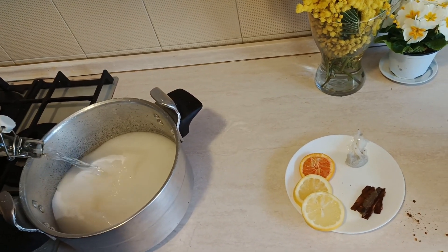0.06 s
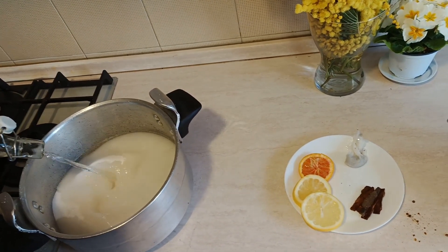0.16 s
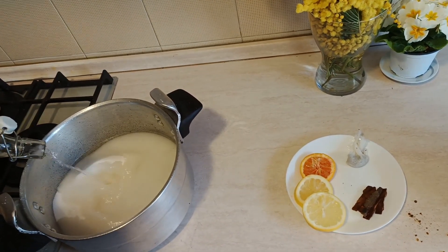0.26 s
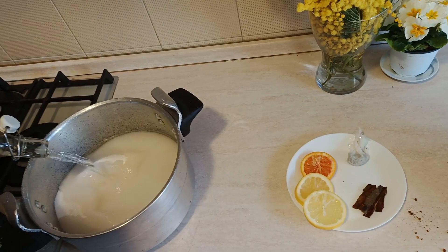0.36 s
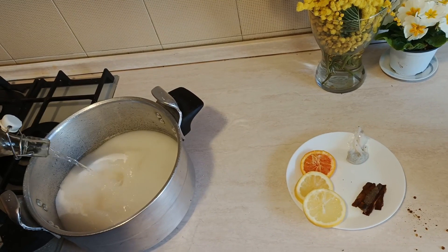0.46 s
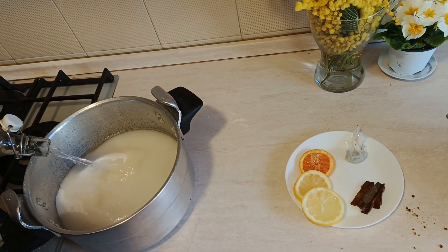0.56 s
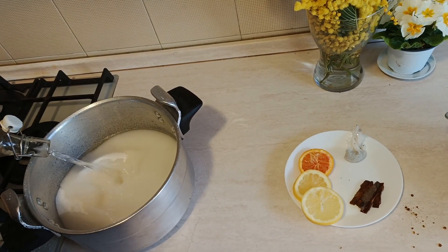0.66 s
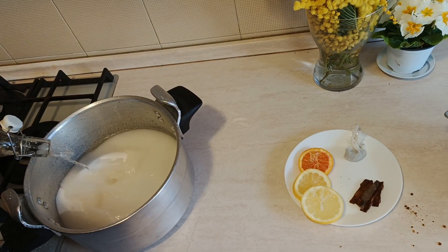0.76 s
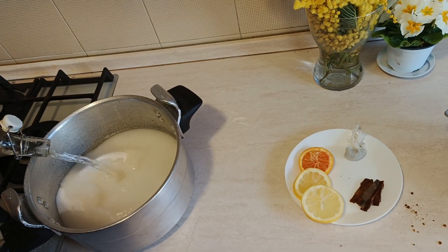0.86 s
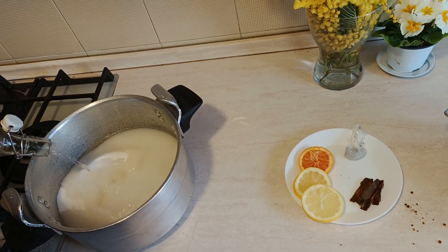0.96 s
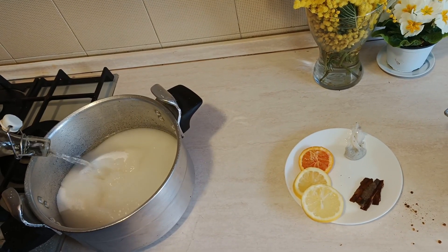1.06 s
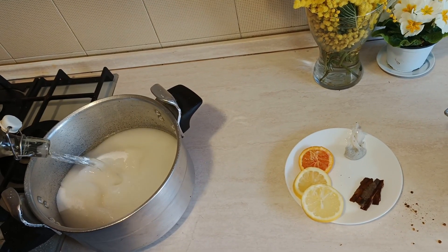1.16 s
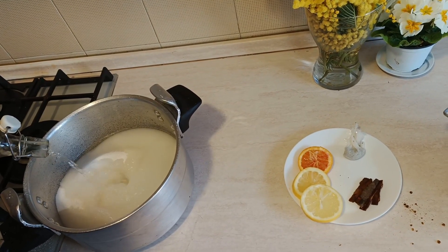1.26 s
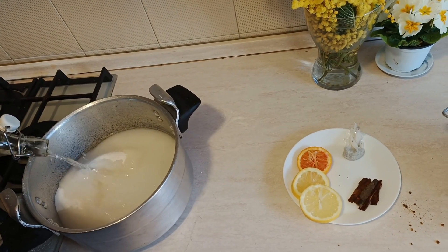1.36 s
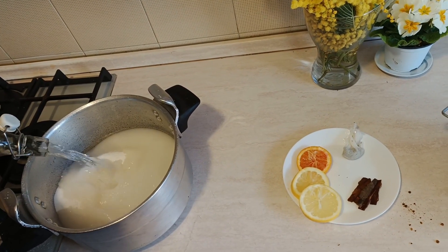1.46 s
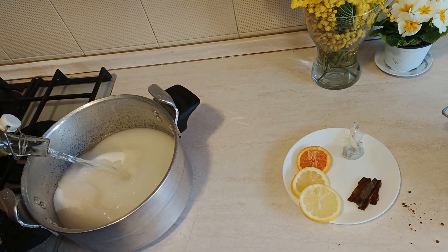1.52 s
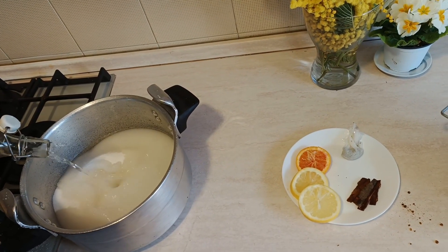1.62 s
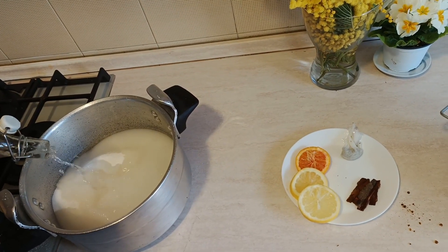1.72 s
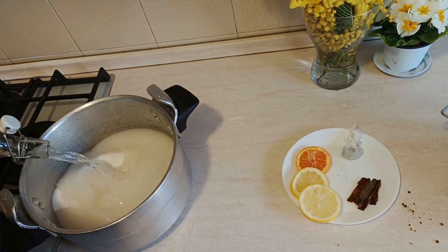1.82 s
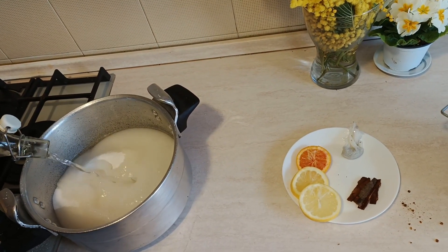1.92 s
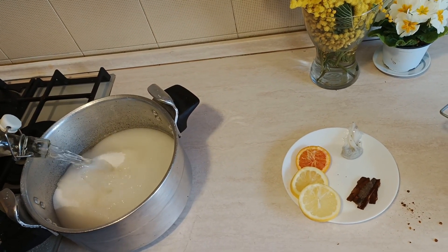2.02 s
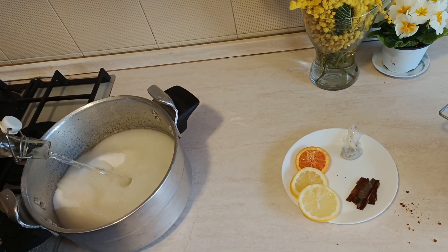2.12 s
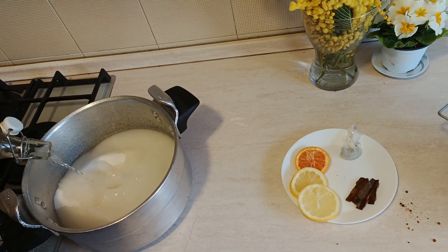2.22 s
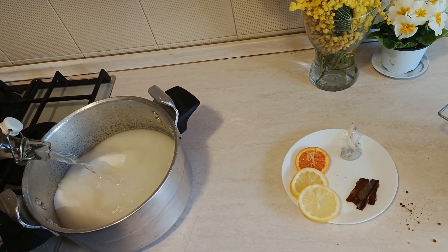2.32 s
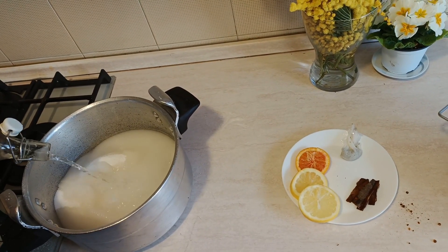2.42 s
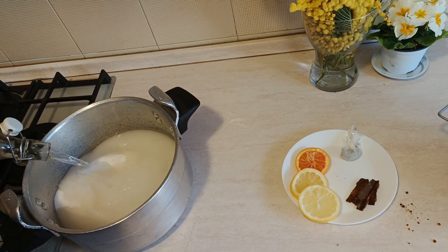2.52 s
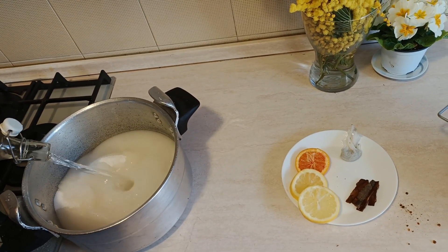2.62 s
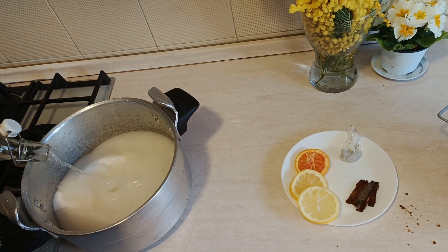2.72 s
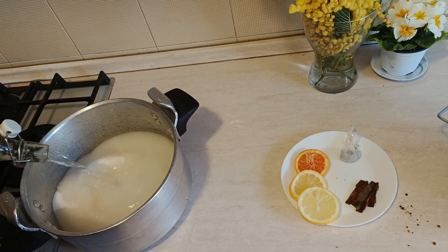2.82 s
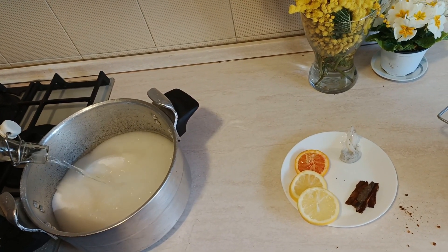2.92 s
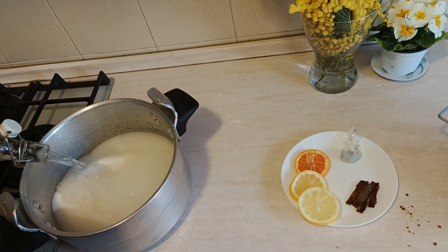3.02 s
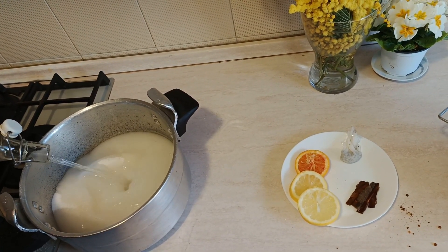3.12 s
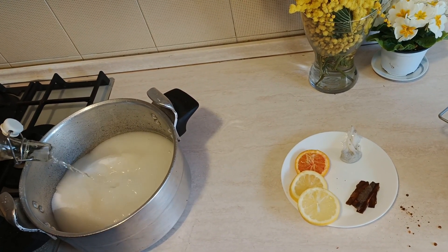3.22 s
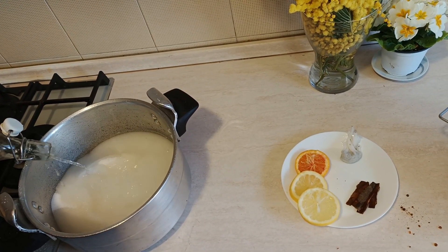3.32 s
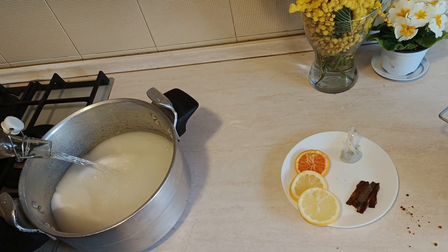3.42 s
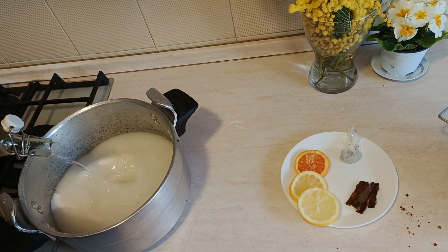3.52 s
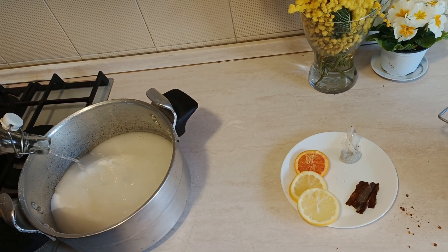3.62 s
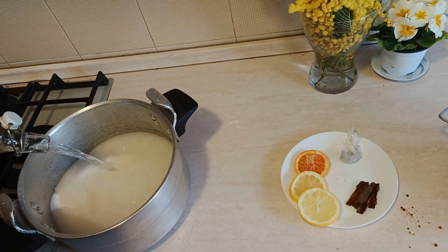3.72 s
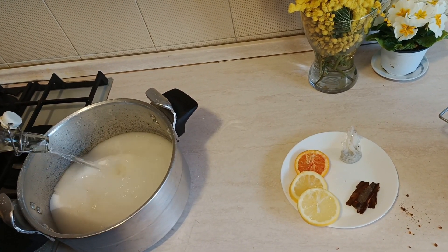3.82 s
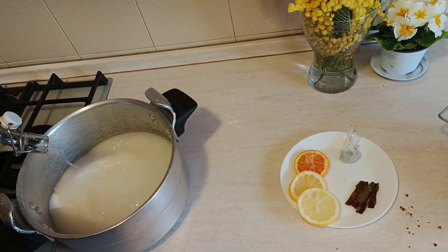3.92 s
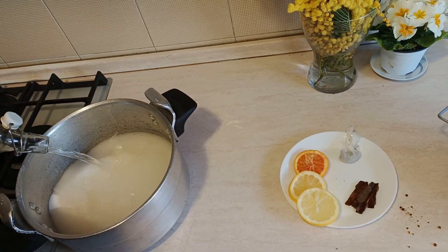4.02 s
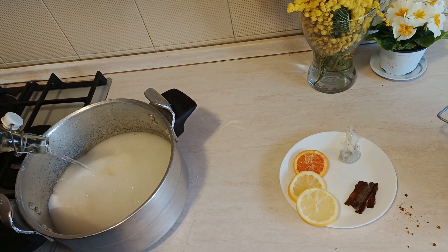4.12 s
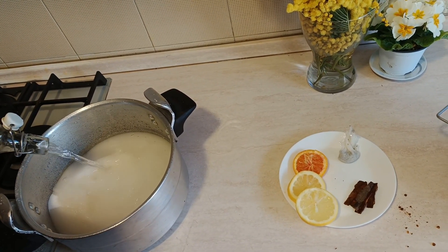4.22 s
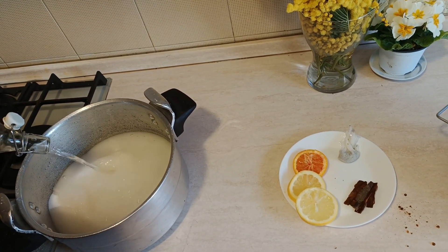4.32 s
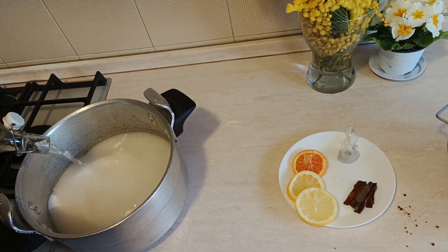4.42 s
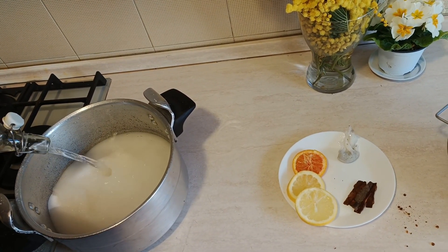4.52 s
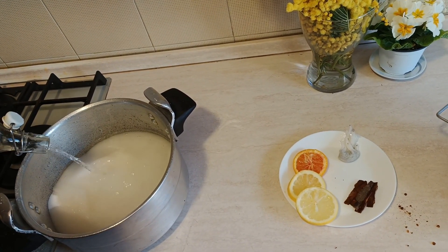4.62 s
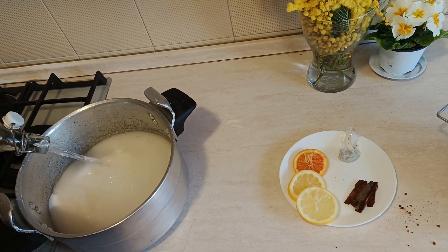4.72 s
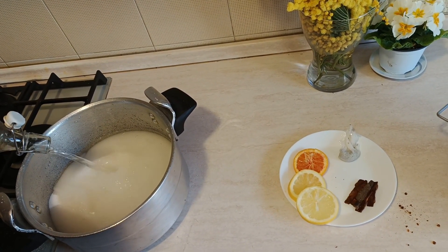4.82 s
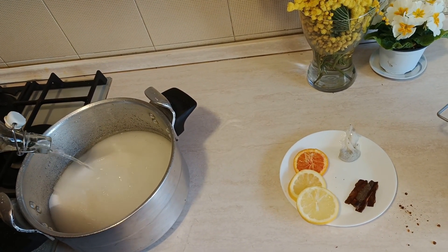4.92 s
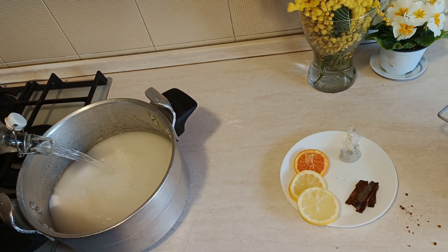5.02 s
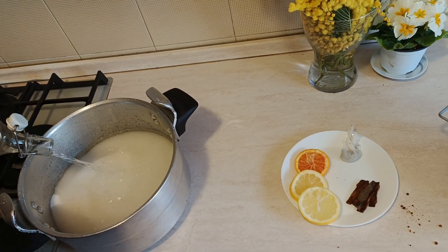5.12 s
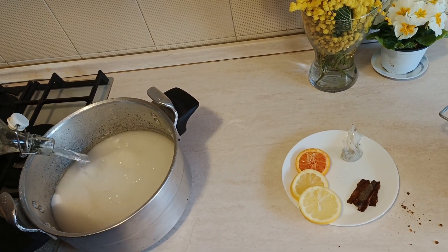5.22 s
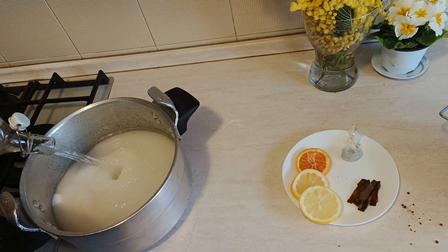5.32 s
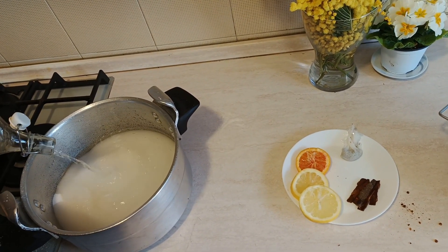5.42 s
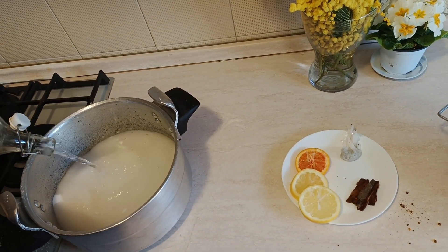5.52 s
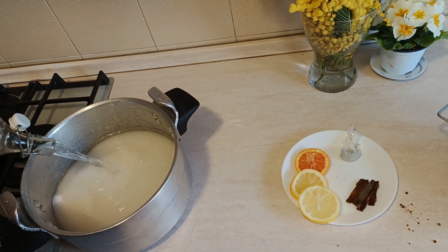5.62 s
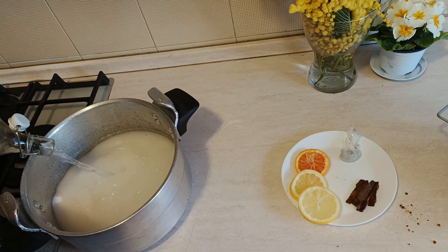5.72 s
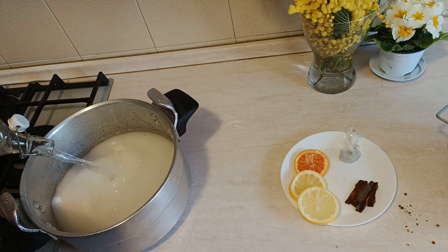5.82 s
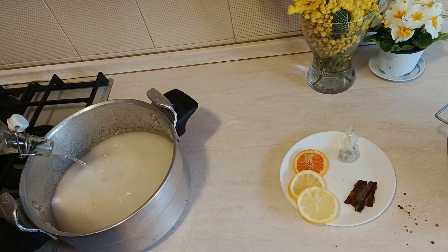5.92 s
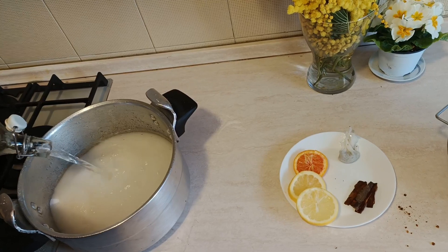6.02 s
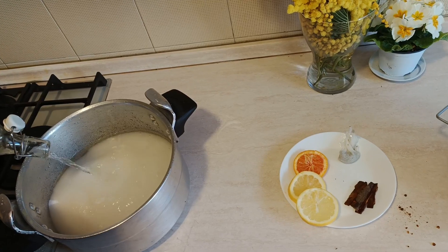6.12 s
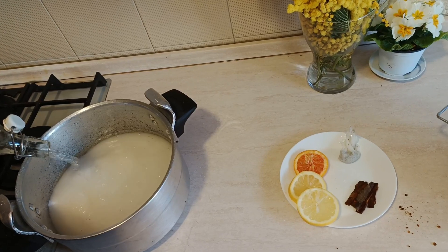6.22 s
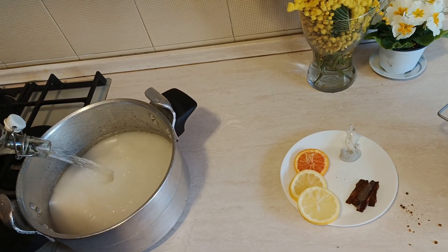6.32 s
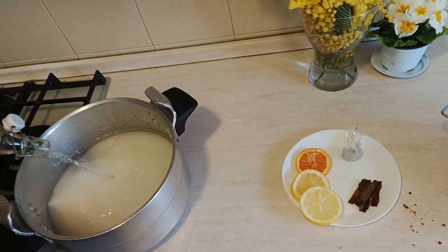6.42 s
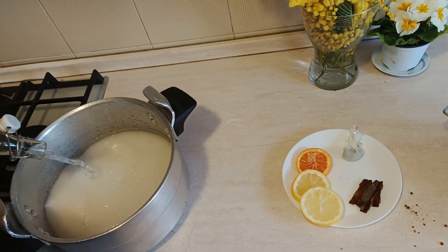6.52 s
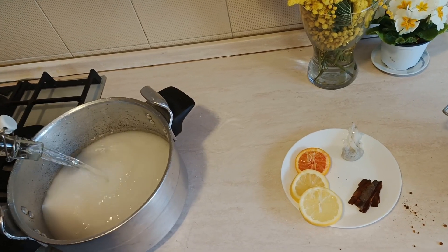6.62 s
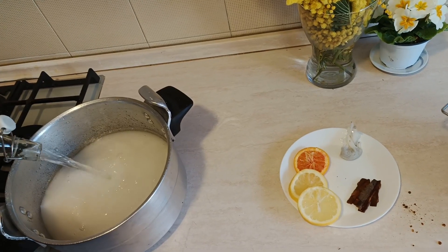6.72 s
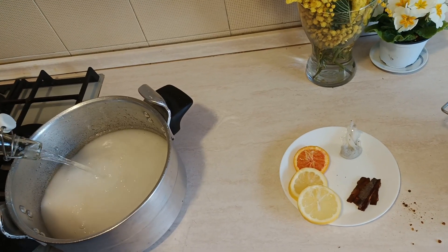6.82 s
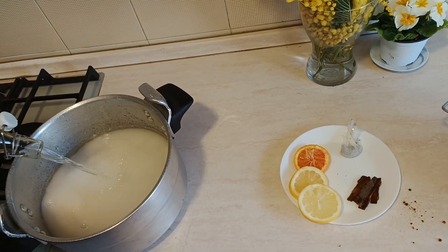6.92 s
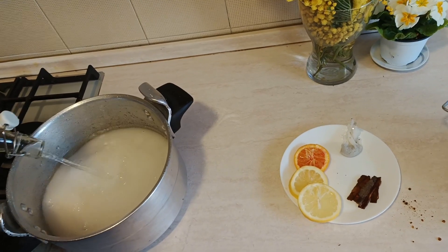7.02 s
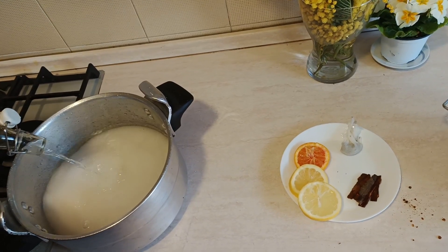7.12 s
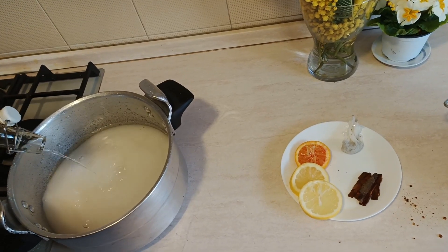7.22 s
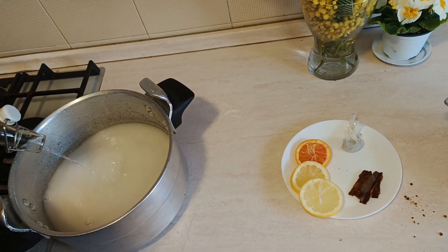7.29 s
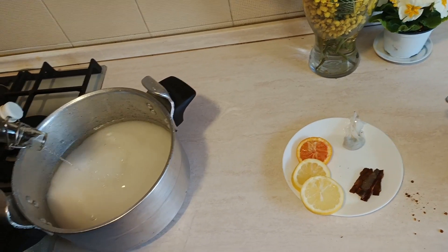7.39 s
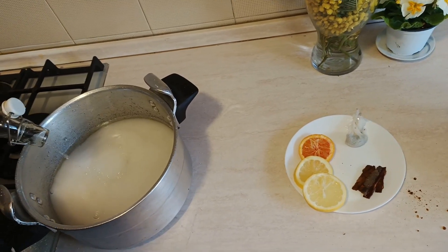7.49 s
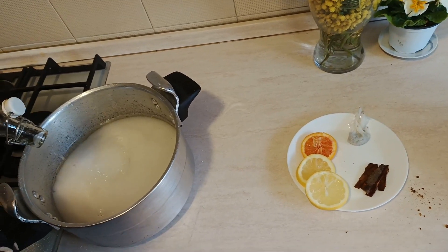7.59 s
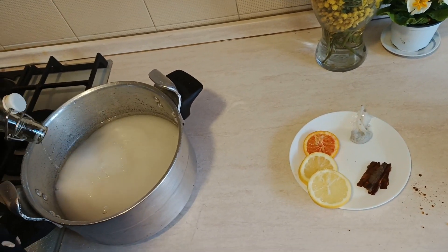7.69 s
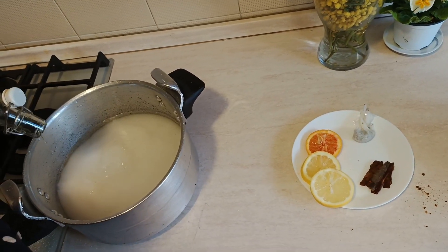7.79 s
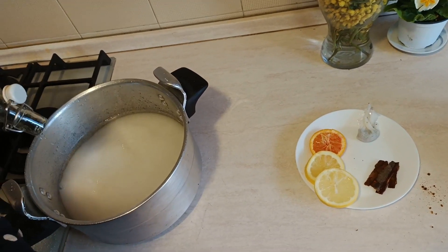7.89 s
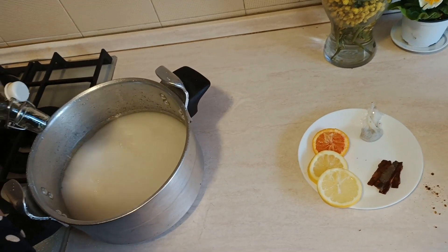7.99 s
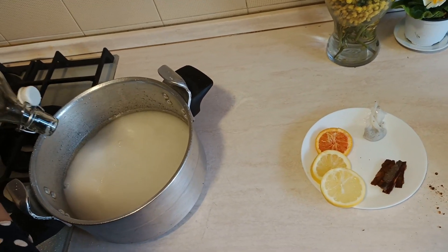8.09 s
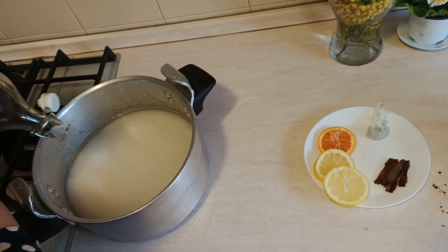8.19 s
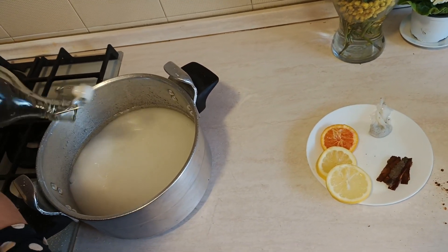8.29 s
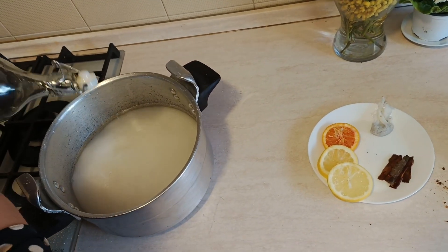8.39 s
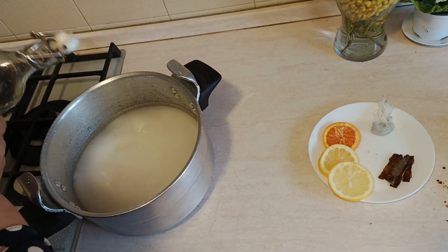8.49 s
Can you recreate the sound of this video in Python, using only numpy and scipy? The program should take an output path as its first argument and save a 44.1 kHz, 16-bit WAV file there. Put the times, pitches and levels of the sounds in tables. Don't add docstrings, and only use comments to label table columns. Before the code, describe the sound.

Close stereo pickup of a bottle being emptied into liquid in a metal pot: lively splashes, tiny crackling droplets, ringing bubbles and low churning, two to four surges a second. Deep glugs grow in the second half while splashing softens. A few dull finger taps on the microphone case occur near the end, then last drips, quiet hum, and a quick rattling glass clink. Short tiled room reflections.

```python
import sys
import numpy as np
from scipy import signal
from scipy.fft import rfft, irfft, next_fast_len
from scipy.io import wavfile
from scipy.ndimage import map_coordinates

SR = 44100
rng = np.random.default_rng(int(sys.argv[2]) if len(sys.argv) > 2 else 0)


def makeup_ratio(level_db):
    decades = np.asarray(level_db, float) / 20
    return 10 ** decades


def file_out(sig):
    cols = np.atleast_2d(sig).T
    lim = np.clip(cols, -1, 1)
    pcm = np.round(lim * 32767).astype(np.int16)
    wavfile.write(sys.argv[1], SR, pcm)


N = 377055
SIZE = next_fast_len(N + SR // 2)
HZ = np.maximum(np.arange(SIZE // 2 + 1) * SR / SIZE, 1.)

# [f/Hz, density/dB per Hz]
HUM = [(40, -3), (130, 2.5), (220, -9.5), (330, -14), (800, -8.5), (1250, -3.5), (1600, -16.5),
       (2400, -17.5), (3200, -5), (5200, -2.5), (7200, -15), (7700, -26), (9700, -29), (13000, -21.5),
       (16000, -28)]
# [f/Hz, width/Hz, rms level/dB]
WHINES = [(129.5, 2.9, -65), (1255, 50, -63.5), (3950, 60, -64), (5220, 70, -61), (7080, 220, -64),
          (13100, 1100, -75)]
# [f/Hz, correlation/0..1]
LIKENESS = [(60, 0.87), (140, 0.92), (330, 0.73), (770, 0.36), (1500, 0.011), (15000, 0.016)]

# [crest t/s, splash level/dB, gurgle level/dB, ebb/s]
SURGES = [(0.077, -35.5, -55.5, 0.19), (0.329, -33.5, -64.5, 0.18), (0.623, -32.5, -62, 0.058),
          (0.85, -30.5, -52, 0.035), (0.968, -34.5, -53.5, 0.045), (1.094, -32, -54.5, 0.19),
          (1.311, -37.5, -57.5, 0.84), (1.75, -35.5, -59, 0.26), (2.141, -30.5, -51, 0.058),
          (2.308, -34, -46, 0.2), (2.56, -36.5, -45.5, 0.3), (2.892, -31, -46.5, 0.1),
          (3.062, -39.5, -54.5, 0.078), (3.167, -35, -45.5, 0.13), (3.389, -34, -39.5, 0.07),
          (3.581, -37, -50, 0.063), (3.677, -37.5, -45, 0.36), (3.974, -30.5, -44.5, 0.17),
          (4.482, -38, -56, 0.22), (4.742, -39.5, -49.5, 0.22), (4.985, -40.5, -46, 0.21),
          (5.255, -43, -52.5, 1), (5.527, -34, -43.5, 0.25), (5.779, -40, -41.5, 0.87),
          (6.052, -39, -45.5, 0.81), (6.249, -42, -45.5, 0.25), (6.516, -38, -44.5, 0.58),
          (6.784, -39, -46.5, 0.56), (7.151, -39.5, -50.5, 0.38), (7.502, -42.5, -55.5, 0.29)]
# [f/Hz, density/dB per Hz]
SPLASH = [(1300, -15.5), (2100, -3.5), (2500, -3), (3200, -2), (5000, 1), (6200, -2.5), (7200, -23),
          (8000, -58)]
# [f/Hz, density/dB per Hz]
GURGLE = [(150, -22), (300, -1.5), (600, -1.5), (800, 0), (1200, -1.5), (1700, -17)]
# [f/Hz, density/dB per Hz]
SPRAY = [(5000, -20), (7500, -23), (10000, -6), (13000, 26), (15500, -22), (17000, -11)]

# [t/s, peak level/dB, f/Hz]
SLAPS = [(.086, -26, 2550), (.3169, -20.5, 3100), (.5312, -19, 3350), (.7519, -25, 2490),
         (.9598, -20, 4080), (1.3163, -14, 5220), (1.726, -26.5, 2350), (2.091, -27.5, 4540),
         (2.2967, -28, 4474), (2.5595, -25.5, 3760), (2.909, -21.5, 5200), (3.0587, -19.5, 4620),
         (3.3917, -25, 3100), (3.544, -25, 4840), (3.6745, -25.5, 3540), (3.9727, -13.5, 2003),
         (4.2056, -27, 4130), (4.478, -15.5, 3073), (4.7134, -27.5, 3200), (4.9539, -27, 3200),
         (5.25, -17, 3090), (5.8691, -24, 4560), (6.0502, -28.5, 2960), (6.236, -24.5, 2540),
         (6.5143, -33, 2440), (7.1664, -26.5, 5540), (7.3643, -28.5, 5600)]
# [t/s, peak level/dB, f/Hz]
PINGS = [(0.0613, -24, 5100), (0.1968, -26, 6100), (0.225, -22.5, 4100), (0.4949, -24, 5340),
         (0.592, -30, 2910), (0.596, -29.5, 2350), (0.6121, -24.5, 3400), (0.6953, -17.5, 5248),
         (1.204, -25.5, 4380), (1.6346, -20.5, 5140), (1.7438, -23.5, 3680), (1.916, -23, 3500),
         (1.956, -26, 5250), (2.3902, -24, 2970), (2.7302, -25, 3600), (2.9662, -25.5, 5160),
         (3.103, -24.5, 4940), (3.715, -21, 6400), (3.995, -21.5, 2140), (4.0873, -22, 5220),
         (4.3963, -23.5, 3700), (4.507, -22, 3200), (4.5502, -24, 3900), (4.89, -23, 4020),
         (5.299, -24.5, 2470), (5.3303, -22, 3855), (6.132, -19, 4540), (6.6186, -23, 4700),
         (7.411, -26.5, 6060), (7.447, -21.5, 4830), (6.1144, -24, 5273)]
# [t/s, peak level/dB, f/Hz]
FLECKS = [(0.018, -27, 4700), (0.1569, -27, 2730), (0.3748, -23.5, 4200), (0.4024, -31.5, 3980),
          (0.4213, -23, 4170), (0.5504, -28, 3530), (0.564, -22, 4180), (0.6371, -27, 4770),
          (0.6734, -28, 4240), (0.8334, -31.5, 1870), (1.1024, -27.5, 2460), (1.1958, -29, 4120),
          (1.7599, -24, 4700), (1.844, -25, 3130), (5.932, -31.5, 2570), (2.3472, -30.0, 3050),
          (2.6096, -33, 3230), (2.6884, -24, 5420), (2.829, -27.5, 3260), (2.8757, -33, 3030),
          (2.9404, -25.5, 5500), (2.9712, -23, 4970), (2.9902, -26, 5200), (3.157, -27, 3240),
          (3.3835, -22.5, 3210), (3.5823, -31.5, 2370), (3.725, -29, 4985), (3.9354, -30, 2380),
          (4.037, -31, 2700), (4.1104, -23, 4940), (4.225, -27, 3600), (4.265, -29, 3100),
          (4.2768, -25, 3060), (4.3728, -32, 4200), (4.725, -34.5, 3200), (4.9212, -28.5, 3360),
          (4.981, -25, 3800), (5.0911, -23.5, 5300), (5.1564, -21, 4100), (5.281, -29, 2470),
          (5.5132, -29.5, 2490), (5.5782, -24.5, 4600), (5.6197, -24.5, 3100), (5.6308, -29, 2670),
          (6.0823, -24, 5000), (6.1474, -32, 2500), (6.3001, -24, 3030), (6.5142, -31, 2510),
          (6.6303, -21, 5500), (6.688, -29, 3010), (6.7305, -32, 3400), (7.3856, -33, 2720),
          (7.4131, -26, 6740), (7.681, -26, 4330)]
# [t/s, peak level/dB, f/Hz]
PLINKS = [(0.3226, -27, 3100), (0.332, -21, 3160), (.41, -32, 4330), (0.4395, -29, 4570),
          (1.0914, -31, 2520), (1.409, -34, 1930), (1.468, -34, 2380), (1.5221, -28, 4955),
          (1.6573, -36, 2430), (1.805, -33, 2520), (2.1442, -34, 4880), (2.2, -32, 4560),
          (3.52, -32.5, 2510), (4.481, -26.5, 2470), (4.489, -25.5, 3760), (4.4945, -26, 6270),
          (4.527, -35, 2460), (4.61, -33, 2500), (5.8386, -34.5, 2520), (6.3378, -29, 2480),
          (6.8727, -30.5, 3320), (6.983, -33.5, 3100), (7.134, -33, 2570), (7.3638, -31.5, 2490),
          (7.501, -35.5, 2700), (7.692, -35, 2490)]
# [t/s, peak level/dB, f/Hz]
HOLLOWS = [
    (1.74, -36, 1794),
    (3.974, -23, 2000),
    (4.006, -22.5, 2110),
    (4.1288, -34.5, 2410),
    (5.553, -35, 1723),
    (6.085, -41.5, 760),
]
# [t/s, peak level/dB, f/Hz]
PLOPS = [(.833, -35.5, 1290), (.963, -36.5, 1035), (1.306, -35, 817), (1.478, -36, 1350),
         (1.659, -32, 1255), (1.763, -36, 790), (2.13, -31.5, 1040), (2.396, -37, 802), (2.559, -43, 596),
         (3.057, -31, 712.5), (3.159, -39.5, 588), (3.208, -35, 1080), (3.33, -37.5, 310), (3.38, -27, 752),
         (3.493, -32, 750), (3.582, -33.5, 1340), (3.674, -32, 345), (3.712, -31, 1290), (3.797, -32, 753),
         (3.97, -47, 448), (4.276, -33, 876), (4.47, -36.5, 973), (5.773, -45, 477.2), (6.052, -37.5, 279),
         (6.248, -38.5, 593), (6.786, -38, 355)]
# [t/s, peak level/dB, f/Hz]
BLOBS = [(0.081, -39, 1670), (0.4638, -45, 1100), (1.3849, -43, 586), (1.5937, -36, 1290),
         (1.8209, -36.5, 782), (1.68, -41.5, 1200), (1.863, -38, 1148), (2.36, -39, 1760),
         (3.2369, -41, 975), (3.58, -41, 595), (3.6926, -40.5, 326), (3.928, -33, 1770),
         (4.5237, -43.5, 633), (5.0585, -44, 600), (5.3136, -40, 1009), (5.3879, -36, 1016),
         (5.575, -33, 1400), (5.595, -36.5, 1160), (5.697, -41, 879), (5.831, -40.5, 320),
         (5.955, -38, 1002), (6.2967, -40, 754), (6.4307, -37.5, 1130), (6.9636, -41, 1060),
         (7.3929, -41.5, 1050), (7.4189, -36, 1100), (7.456, -35.5, 732), (7.468, -40, 760),
         (7.507, -41, 1100)]
# [t/s, peak level/dB, f/Hz]
SPECKS = [(0.5758, -36, 9930), (0.7192, -37, 9250), (1.0818, -34, 9050), (1.108, -41, 11890),
          (1.1949, -38, 8900), (1.4798, -33.5, 13400), (1.8431, -33, 13150), (2.0907, -39, 9700),
          (2.3083, -36, 9620), (2.3712, -25.5, 15000), (2.5639, -32.5, 12100), (2.6163, -33, 11800),
          (2.8762, -43, 12200), (2.9717, -40, 8440), (3.8427, -37, 13400), (4.0072, -37, 8490),
          (4.0966, -41, 8870), (4.3274, -39, 8900), (4.5567, -37, 8540), (5.1727, -35.5, 9240),
          (5.8396, -39, 13500), (5.9661, -31, 13140), (6.0572, -38.5, 9200), (6.5178, -35.5, 8100),
          (7.0414, -38, 11800), (7.3427, -35, 12260), (7.7523, -40, 8400)]
# [t/s, peak level/dB]
TICKS = [(.2309, -28.5), (.4199, -27.5), (.6399, -29), (1.5424, -27), (2.2189, -24.5), (3.241, -29),
         (3.3204, -27.5), (4.3715, -29), (5.263, -29), (5.6296, -24.5), (6.2472, -23), (6.6298, -31.5),
         (6.783, -27.5), (7.2988, -31.5), (7.59, -32), (7.65, -34.5), (7.777, -41), (7.915, -41),
         (8.052, -37), (8.092, -46)]
# [t/s, peak level/dB, f/Hz]
DRIPS = [
    (7.608, -38, 940),
    (7.628, -28.5, 1010),
    (7.66, -36, 1060),
    (7.693, -26.5, 1120),
    (7.7546, -20.5, 2560),
]

# [f/Hz, density/dB per Hz]
CRACK = [(1200, -17.5), (3000, 11.5), (6000, 10.5), (8000, -9.0), (16000, -7.5)]
TICK = [(4000, -7.5), (7500, 4.5), (10000, -3.5), (13000, -2.5), (16000, -7)]
CAVITY = [(150, -17.5), (280, -2), (430, 7.5), (800, 2.5), (2000, -19.5)]
# [f/Hz, gain/dB]
RIM = [(1380, 0.5), (1580, -2.5), (1700, -1), (7000, 0), (7500, -3.5)]
# [f/Hz, width/Hz, level/dB]
POT = [(345, 35, -6), (478.5, 13, 7), (596, 13.3, -3), (760, 13, 7), (1797, 54, 5.5), (2478, 98, 10),
       (3090, 41, -2.5)]

# [t/s, peak level/dB, f/Hz, life/cycles]
GULPS = [(0.667, -49, 182, 21), (2.907, -48, 107, 11.6), (3.46, -30, 114.2, 8), (3.67, -38, 94, 5),
         (3.813, -44.5, 116, 11), (3.966, -50.5, 123, 6.4), (4.331, -41, 112, 8.7), (4.587, -39, 123, 16.5),
         (4.844, -31, 114, 5.2), (4.979, -48, 95, 9.3), (5.369, -35, 110, 9.2), (5.643, -35, 101.1, 8.3),
         (5.838, -32.5, 116, 8.4), (6.072, -22, 103.9, 4.9), (6.328, -40.5, 126, 13), (6.64, -39, 89.4, 19)]
# [t/s, peak level/dB, left minus right/dB, contact/ms]
TAPS = [
    (6.862, -31, -46, 0.26),
    (6.897, -28.5, -31, 0.41),
    (7.083, -24.5, -34, 0.26),
    (7.101, -26.5, -22.5, 0.25),
    (7.311, -29, -29.5, 0.3),
    (7.372, -27.5, -26.5, 0.27),
    (7.527, -24, -33.5, 0.31),
]
# [t/s, peak level/dB, seat/0 neck to 1 shoulder]
CLINKS = [(8.302, -39, 0.45), (8.4505, -37, 0.1), (8.4615, -23, .05), (8.4638, -17, 0.046),
          (8.4685, -19.5, .2), (8.4743, -25, 0.022), (8.4831, -23, 0.12), (8.4991, -11.5, 0.96),
          (8.502, -19, .5), (8.5059, -21, 0.3), (8.528, -22.5, 0.3)]
# [f/Hz, level at neck/dB, level at shoulder/dB, T60/s]
GLASS = [(2268, -40, -7.5, 0.085), (2800, -31, -5, 0.07), (3100, -24, 9, 0.0068), (3600, 2.5, -4, 0.019),
         (4030, -12, -9, .03), (4516, 11.5, 3, 0.025), (4700, 11.5, 1, 0.054), (5580, 8.5, -11, 0.08),
         (5770, 2, -12, 0.027), (6470, 6.5, -5, 0.022), (7640, -4, -11, 0.034), (9700, -12, -28, 0.041),
         (12600, -6, -25, 0.04), (15300, -4, -20, .025)]
# [f/Hz, density/dB per Hz]
KNOCK = [(250, 9.5), (1000, 15.0), (2500, -9)]

# [f/Hz, left minus right/dB]
PORTS = [(60, 1.5), (150, 2), (1500, 3.5), (2380, -10.5), (3770, 4), (5980, -1), (9470, 15), (15000, 4.5)]
# [f/Hz, gain/dB]
PORT_EDGES = [(20, -15), (45, 0), (15800, 0), (16050, -24), (16600, -30), (17000, -70)]

HUM_DB = -51
SWELL_S, SWELL_PER_EBB, QUICKEST_S = 0.12, 0.37, 0.0107
SPLASH_SWING_DB, GURGLE_SWING_DB = 15, 18.5
TRICKLE_SPLASH_DB, TRICKLE_GURGLE_DB = -51, -68
STREAM_END_S, DYING_DB_PER_S = 7.72, 180
SPATTERS, SPATTER_DB, SPATTER_SPREAD_DB = 170, 6.5, 3.5
SPATTER_LOW_HZ, SPATTER_OCTAVES = 2296, 1.65
PLUNGE_DB, PLUNGE_T60_S = 3, 0.15
NARROWEST_HZ = 38
KITCHEN_T60_S, KITCHEN_DB = .25, -4
RIGHT_LAG = 9
WANDER_SAMPLES, WANDER_PER_S = 1.8, 25.
LIFT_S, LIFT_LAG = 8.2, 3.5


def rms_one(x):
    return x / np.sqrt(np.mean(x ** 2) + 1e-20)


def at_hz(points, hz):
    table_hz, values = np.array(points)[:, 0], np.array(points)[:, 1]
    return np.interp(np.log(hz), np.log(table_hz), values)


def colour(x, db):
    cepstrum = irfft(db * np.log(10) / 20, SIZE)
    cepstrum[1:SIZE // 2] *= 2
    cepstrum[SIZE // 2 + 1:] = 0
    response = np.exp(rfft(cepstrum))
    return irfft(rfft(x, SIZE) * response, SIZE)[..., :N]


def resonance(x, hz, width_hz):
    r = np.exp(-np.pi * width_hz / SR)
    poles = [1, -2 * r * np.cos(2 * np.pi * hz / SR), r * r]
    return signal.lfilter([(1 - r * r) / 2, 0, (r * r - 1) / 2], poles, x + 1e-18)


def drift(rate):
    r = np.exp(-2 * np.pi * rate / SR)
    wander = signal.lfilter([1], [1, -2 * r, r * r], rng.standard_normal(N + SR))
    return rms_one(wander[SR:])


def bubbles(rows, cycles, rise, onset_cycles, trim_db, scatter=0, mates_db=-6, count=1):
    out = np.zeros(N + SR)
    chance = rng.uniform(-1, 1, (len(rows), count, 3))
    for row, life, draws in zip(rows, np.broadcast_to(cycles, len(rows)), chance):
        for k, (detune, late, phase) in enumerate(draws):
            is_mate = k > 0
            hz = row[2] * np.exp(scatter * detune * is_mate)
            t60 = max(life, 2) / hz / (2 if is_mate else 1)
            t = np.arange(int(t60 * SR * .7)) / SR
            swell = 1 - np.exp(-t * hz / onset_cycles)
            tone = np.sin(2 * np.pi * hz * (t + rise * t * t / t60 / 2) + np.pi * phase)
            peak_db = row[1] + trim_db + mates_db * is_mate
            at = int((row[0] + is_mate * (1 + late) * 2.786 / hz) * SR)
            out[at:at + len(t)] += makeup_ratio(peak_db - 60 * t / t60) * swell * tone
    return out[:N]


def snaps(rows, trim_db, spectrum):
    clicks = np.zeros(N)
    at = [int(row[0] * SR) for row in rows]
    clicks[at] = makeup_ratio(np.array([row[1] for row in rows]) + trim_db)
    puffs = signal.lfilter([.15], [1, -1.9, .9025], clicks) * rng.standard_normal(N)
    return colour(puffs, at_hz(spectrum, HZ))


def hum():
    mid, side = rng.standard_normal((2, SIZE))
    alike = at_hz(LIKENESS, HZ)
    shared = rfft(mid) * np.sqrt(1 + alike)
    opposed = rfft(side) * np.sqrt(1 - alike) * [[1], [-1]]
    pair = irfft(shared + opposed, SIZE)[:, :N]
    out = makeup_ratio(HUM_DB + 2.0) * rms_one(colour(pair, at_hz(HUM, HZ)))
    for hz, width, db in WHINES:
        out = out + makeup_ratio(db) * rms_one(resonance(resonance(pair, hz, width), hz, width))
    return out


def flow(column, swing_db, trickle_db, longest_s):
    t = np.arange(0, N, 64) / SR
    rows = np.array(SURGES)[:, :, None]
    late, ebb = t - rows[:, 0], rows[:, 3]
    swell = np.maximum(SWELL_S - SWELL_PER_EBB * ebb, QUICKEST_S)
    surges = rows[:, column] - swing_db * np.maximum(late / np.minimum(ebb, longest_s), -late / swell)
    level = 10 * np.log10(np.sum(makeup_ratio(2 * surges), axis=0) + makeup_ratio(2 * trickle_db))
    dying = DYING_DB_PER_S * np.maximum(t - STREAM_END_S, 0)
    return np.interp(np.arange(N) / SR, t, level - dying)


def swarm(level_db, clumps_db, spectrum, spread_db, cycles, rise, count):
    when, size, pitch, life = rng.random((count, 4)).T
    share = np.cumsum(makeup_ratio(clumps_db) * (level_db > -100))
    born = np.searchsorted(share, when * share[-1]).clip(0, N - 1)
    hz = spectrum[0][0] * (spectrum[-1][0] / spectrum[0][0]) ** pitch
    peak_db = at_hz(spectrum, hz) + 20 * np.log10(hz) - spread_db * np.log(np.maximum(size, .03))
    rows = np.transpose([born / SR, peak_db, hz])
    cloud = bubbles(rows, cycles * (0.88 + 1.37 * life), rise, onset_cycles=0.61, trim_db=0)
    return makeup_ratio(level_db) * rms_one(cloud)


def grains(spectrum, per_s, spread_db, cycles, clumps_db, noise_db):
    sizes = makeup_ratio(spread_db * np.minimum(rng.exponential(1, N), 4)) * rng.choice([-1, 1], N)
    born = rng.random(N) < per_s * makeup_ratio(clumps_db) / SR
    pitches = np.geomspace(spectrum[0][0], spectrum[-1][0], 18)
    dealt = rng.integers(0, 18, N)
    cloud = np.zeros(N)
    for k, hz in enumerate(pitches):
        ringing = resonance(sizes * born * (dealt == k), hz, 1.8 * hz / cycles)
        cloud += makeup_ratio(at_hz(spectrum, hz)) * hz ** .5 * rms_one(ringing)
    hiss = colour(rng.standard_normal(N), at_hz(spectrum, HZ))
    return rms_one(rms_one(cloud) + makeup_ratio(noise_db) * rms_one(hiss))


def stream(splash_db, gurgle_db, clumps):
    splash = swarm(splash_db - 5.5, 7.5 * clumps, SPLASH, spread_db=4.0, cycles=16.0, rise=0.051, count=3800)
    gurgle = swarm(gurgle_db - 4.0, 3 * clumps, GURGLE, spread_db=1.0, cycles=17.0, rise=0.52, count=1500)
    spray_clumps_db = 8.8 * clumps + 7 * drift(28.0)
    spray = grains(SPRAY, 1200., 4.5, cycles=2.5, clumps_db=spray_clumps_db, noise_db=-20)
    crackle = grains(SPLASH, 1500., 12.2, cycles=5.7, clumps_db=4.6 * clumps, noise_db=-2.5)
    return splash + gurgle + makeup_ratio(splash_db - 22.0) * spray + makeup_ratio(splash_db - 12.0) * crackle


def rumble(gurgle_db):
    floor = resonance(resonance(rng.standard_normal(N), 106, 47), 77, 75)
    return makeup_ratio(gurgle_db - 9 + 2.5 * drift(12.0)) * rms_one(floor)


def pings():
    out = bubbles(SLAPS + PINGS, 35.3, rise=0.15, onset_cycles=1.3, trim_db=6.0, scatter=0.28, count=4)
    out += bubbles(FLECKS + PLINKS, 26.8, rise=0.074, onset_cycles=1.96, trim_db=8.5, scatter=0.16, count=3)
    out += bubbles(HOLLOWS, 107.0, rise=0.024, onset_cycles=2.2, trim_db=3.5,
                   scatter=0.03, mates_db=-17.0, count=2)
    return out


def cracks(thrown):
    faint = [(s, db - 3.0) for s, db, hz in FLECKS + PLINKS]
    fallen = [(s, db - 10.0) for s, db, hz in thrown]
    return snaps(SLAPS + PINGS + faint + fallen, -9.0, CRACK)


def plunges():
    clicks = np.zeros(N)
    at = [int((row[0] - QUICKEST_S / 2) * SR) for row in SURGES]
    clicks[at] = makeup_ratio(np.array(SURGES)[:, 2] + PLUNGE_DB)
    envelope = signal.lfilter([1], [1, -makeup_ratio(-60 / (PLUNGE_T60_S * SR))], clicks)
    return envelope * rms_one(colour(rng.standard_normal(N), at_hz(CAVITY, HZ)))


def plops():
    large = bubbles(PLOPS, 40.7, rise=0.2, onset_cycles=1.0, trim_db=1.5, scatter=0.396, count=4)
    blobs = bubbles(BLOBS, 29.6, rise=0.15, onset_cycles=0.49, trim_db=3.5, scatter=0.36, count=3)
    return large + blobs


def spatter(splash_db, clumps_db):
    when, size, pitch = rng.random((SPATTERS, 3)).T
    share = np.cumsum(makeup_ratio(clumps_db))
    at = np.searchsorted(share, when * share[-1]).clip(0, N - 1)
    peak_db = splash_db[at] + SPATTER_DB - SPATTER_SPREAD_DB * np.log(np.maximum(size, .1))
    return np.transpose([at / SR, peak_db, SPATTER_LOW_HZ * 2 ** (SPATTER_OCTAVES * pitch)])


def drops(thrown):
    fallen = bubbles(thrown, 28.0, rise=0.047, onset_cycles=0.78, trim_db=-2.0, scatter=0.1, count=3)
    drips = bubbles(DRIPS, 42.0, rise=0.037, onset_cycles=1.0, trim_db=-0.5,
                    scatter=0.07, mates_db=-13, count=3)
    return fallen + drips


def droplets():
    ticks = snaps(TICKS, -0.83, TICK)
    specks = bubbles(SPECKS, 17.6, rise=.05, onset_cycles=0.57, trim_db=11.5, scatter=0.14, count=4)
    return ticks + specks


def pot(surface):
    out = surface.copy()
    for k, (hz, width, db) in enumerate(POT):
        out += (-1) ** k * makeup_ratio(db) * resonance(surface, hz, max(width, NARROWEST_HZ))
    return out


def water():
    splash_db = flow(column=1, swing_db=SPLASH_SWING_DB, trickle_db=TRICKLE_SPLASH_DB, longest_s=.9)
    gurgle_db = flow(column=2, swing_db=GURGLE_SWING_DB, trickle_db=TRICKLE_GURGLE_DB, longest_s=0.45)
    clumps = drift(22)
    thrown = spatter(splash_db, 7 * clumps)
    surface = stream(splash_db, gurgle_db, clumps) + rumble(gurgle_db)
    surface += pings() + cracks(thrown) + plunges() + plops() + drops(thrown) + droplets()
    return pot(colour(surface, at_hz(RIM, HZ)))


def kitchen(x):
    t = np.arange(SR // 2) / SR
    clutter = makeup_ratio(10 - 60 * t / .04)
    envelope = (makeup_ratio(-60 * t / KITCHEN_T60_S) + clutter) * (1 - np.exp(-t / 0.0021))
    tail = rng.standard_normal((2, len(t))) * envelope
    tail = signal.sosfilt(signal.butter(1, [350, 16000], "band", fs=SR, output="sos"), tail)
    tail = tail / np.sqrt(np.sum(tail ** 2, axis=1, keepdims=True))
    return makeup_ratio(KITCHEN_DB) * irfft(rfft(x, SIZE) * rfft(tail, SIZE), SIZE)[:, :N]


def gulps():
    return bubbles(GULPS, np.array(GULPS)[:, 3], rise=-0.27, onset_cycles=1.77, trim_db=13.5)


def taps():
    out = np.zeros((2, N))
    t_ms = np.arange(SR // 100) / SR * 1000
    for s, db, pan_db, ms in TAPS:
        dip = np.exp(-((t_ms - 3 * ms) / ms) ** 2)
        rebound = .6 * np.exp(-((t_ms - 8 * ms) / (3.5 * ms)) ** 4)
        i = int(s * SR)
        out[:, i:i + len(t_ms)] += makeup_ratio(db - 6.5 + pan_db * np.array([[.5], [-.5]])) * (rebound - dip)
    ring = np.sin(2 * np.pi * 1.436 * t_ms) + .5 * np.sin(2 * np.pi * 2.8 * t_ms)
    snap = makeup_ratio(-20.5) * np.exp(-((t_ms - 2) / 0.44) ** 2) * ring
    i = int(7.264 * SR)
    out[:, i:i + len(t_ms)] += snap * makeup_ratio([[0], [-12]])
    return signal.sosfilt(signal.butter(2, 70, "high", fs=SR, output="sos"), out)


def stopper():
    s, peak_db, seat = np.transpose(CLINKS)
    at, out = (s * SR).astype(int), np.zeros(N)
    soft = 0.73 * np.minimum(peak_db + 15, 0)
    for hz, neck_db, shoulder_db, t60 in GLASS:
        seat_db = neck_db + seat * (shoulder_db - neck_db)
        strike_db = peak_db - 7.5 + seat_db + soft * abs(np.log2(hz / 4700))
        clicks = np.zeros(N)
        clicks[at] = makeup_ratio(strike_db) * rng.choice([-1, 1], len(at))
        r, w = makeup_ratio(-60 / (t60 * SR)), 2 * np.pi * hz / SR
        out += signal.lfilter([0, np.sin(w)], [1, -2 * r * np.cos(w), r * r], clicks + 1e-18)
    t = np.arange(SR // 10) / SR
    for i, db in zip(at[2:], peak_db[2:]):
        burst = makeup_ratio(db - 14 - 60 * t / 0.039) * rng.standard_normal(len(t))
        rattle = resonance(burst, 4800, 4100) + makeup_ratio(-15) * burst
        out[i:i + len(t)] += rattle[:N - i]
    glass = signal.sosfilt(signal.butter(3, 1900, "high", fs=SR, output="sos"), out)
    knock = snaps([CLINKS[3], CLINKS[7]], -21.0, KNOCK)
    boom = bubbles([(CLINKS[7][0], -38, 110)], 36.0, rise=0, onset_cycles=0.57, trim_db=-5)
    return glass + knock + boom


def scene():
    near = water() + gulps() + stopper()
    lag = RIGHT_LAG + WANDER_SAMPLES * drift(WANDER_PER_S) + LIFT_LAG * (np.arange(N) > LIFT_S * SR)
    right = map_coordinates(near, [np.arange(N) - lag], order=3)
    return np.array([near, right]) + kitchen(near) + hum() + taps()


def band_limit(x):
    return signal.sosfilt(signal.butter(12, 16850, fs=SR, output="sos"), x)


def record(dry):
    tilt_db = at_hz(PORTS, HZ) / 2
    edges_db = at_hz(PORT_EDGES, HZ)
    left = colour(dry[0], edges_db + tilt_db)
    right = colour(dry[1], edges_db - tilt_db)
    return band_limit(np.array([left, right]))


dry = scene()
out = record(dry)
file_out(out)
```